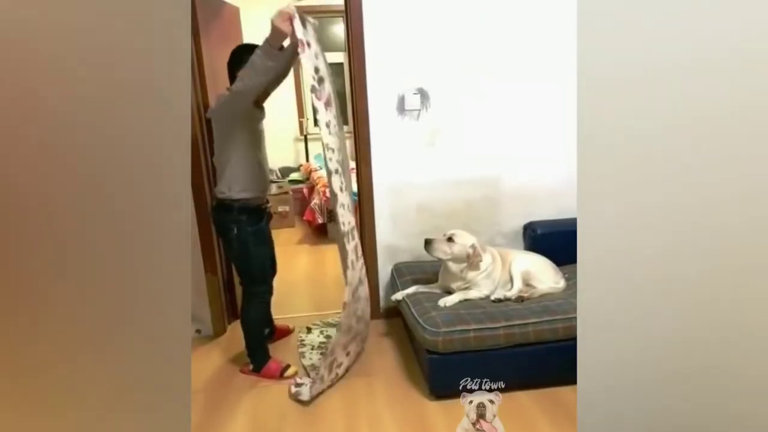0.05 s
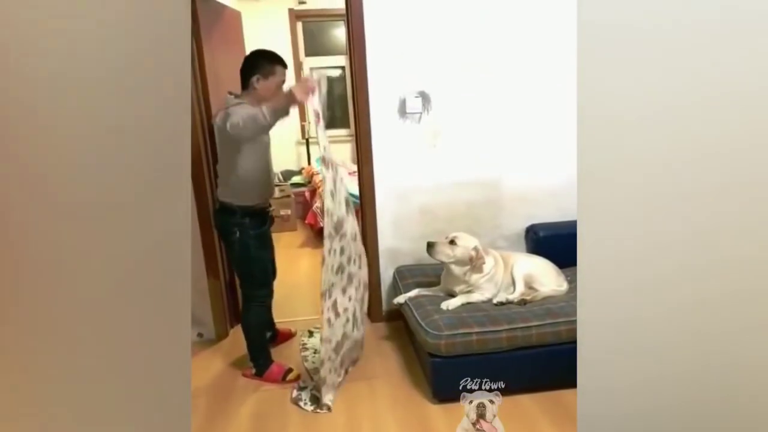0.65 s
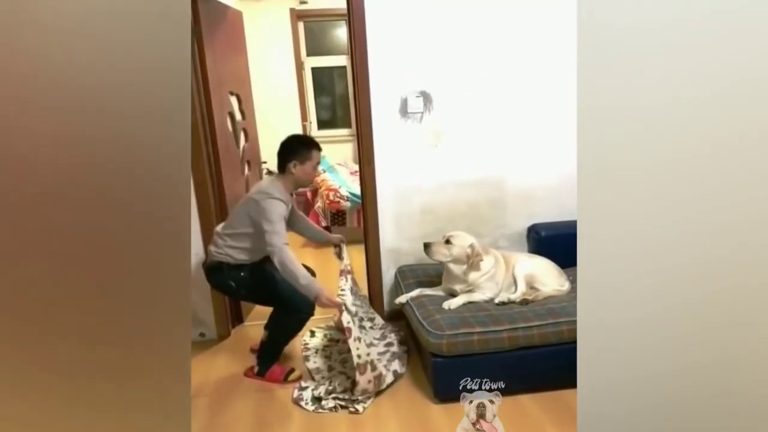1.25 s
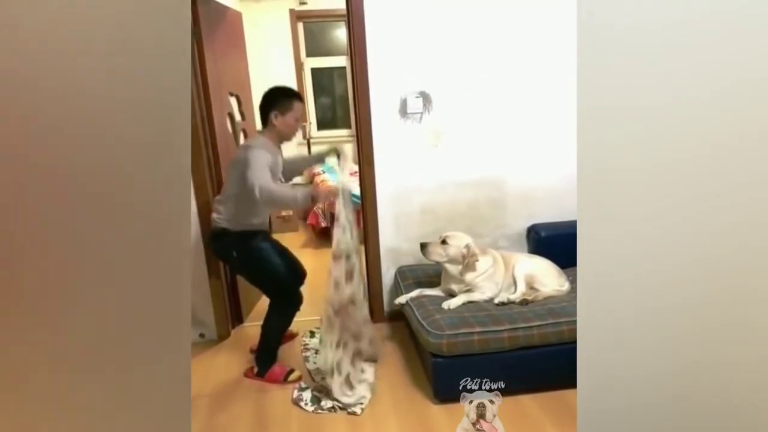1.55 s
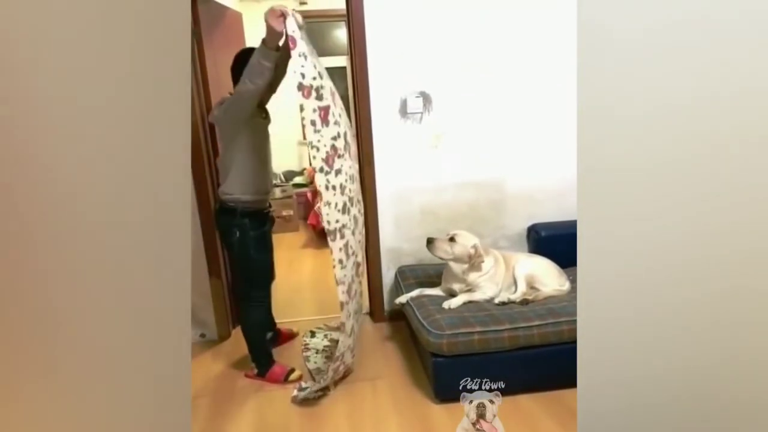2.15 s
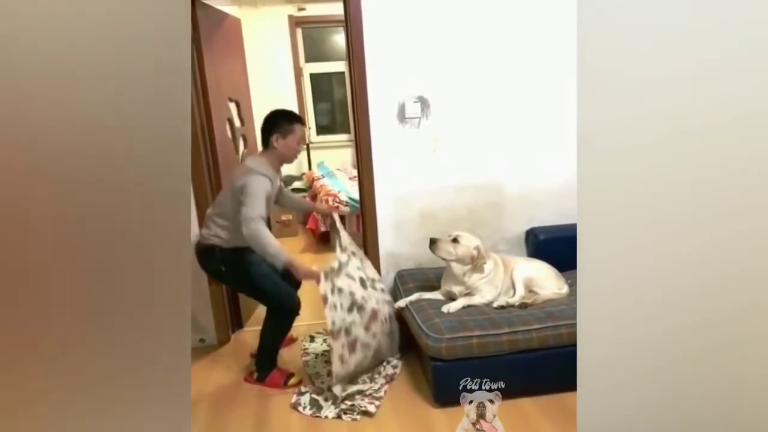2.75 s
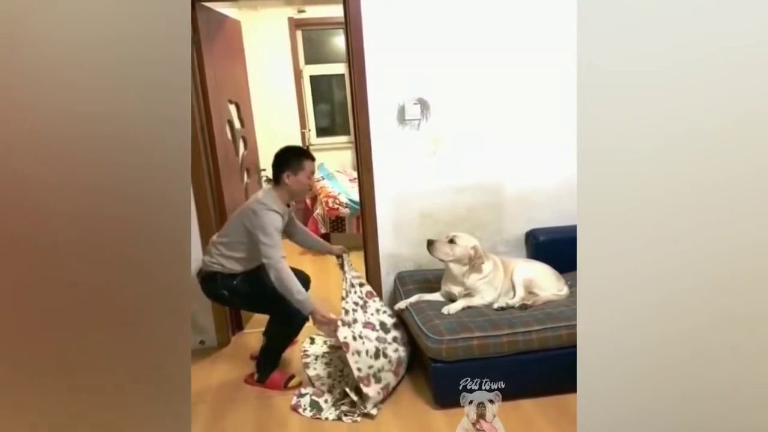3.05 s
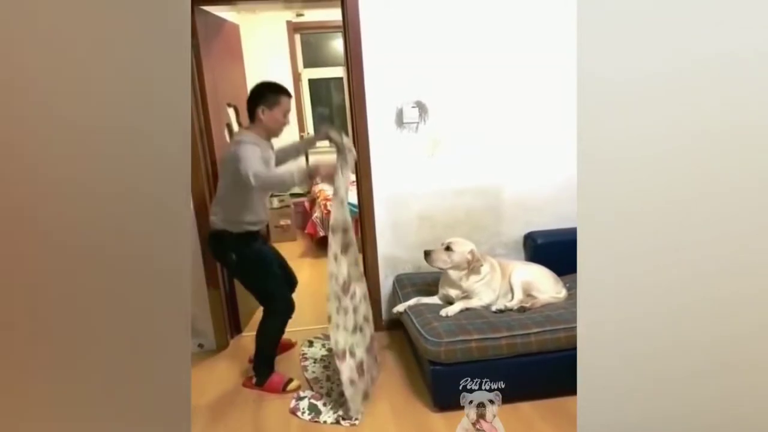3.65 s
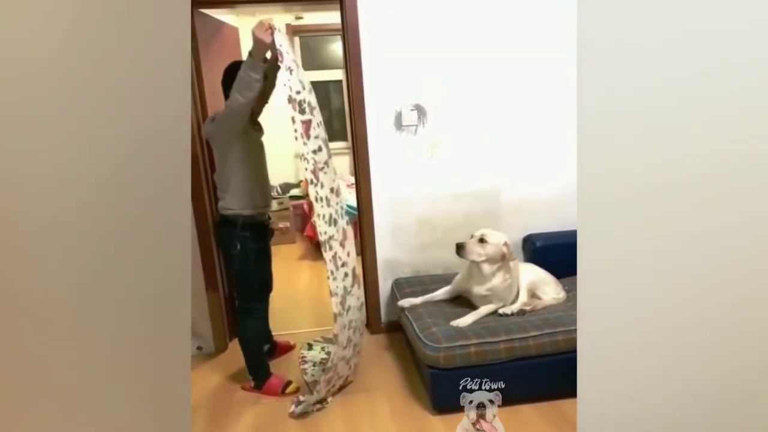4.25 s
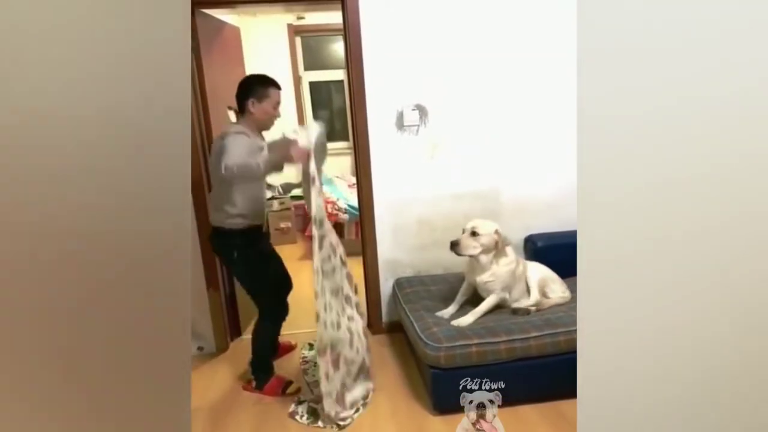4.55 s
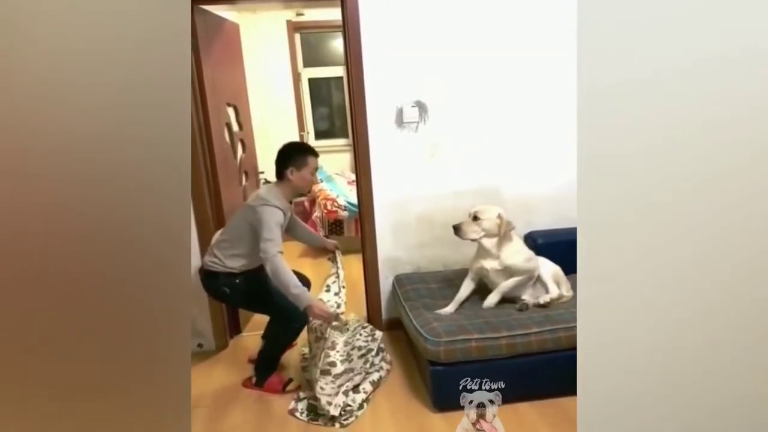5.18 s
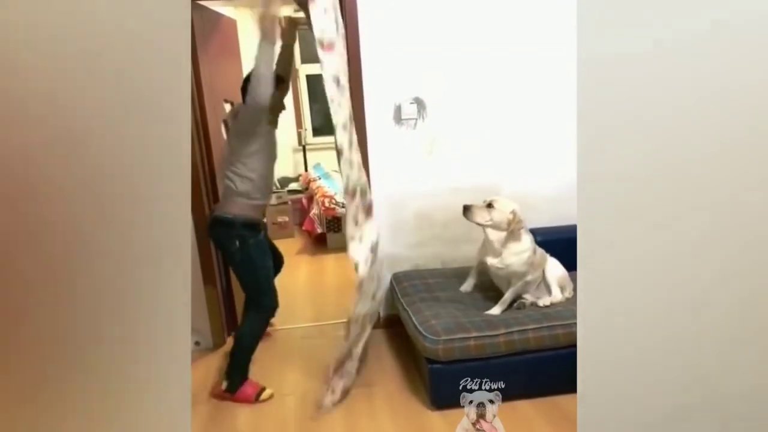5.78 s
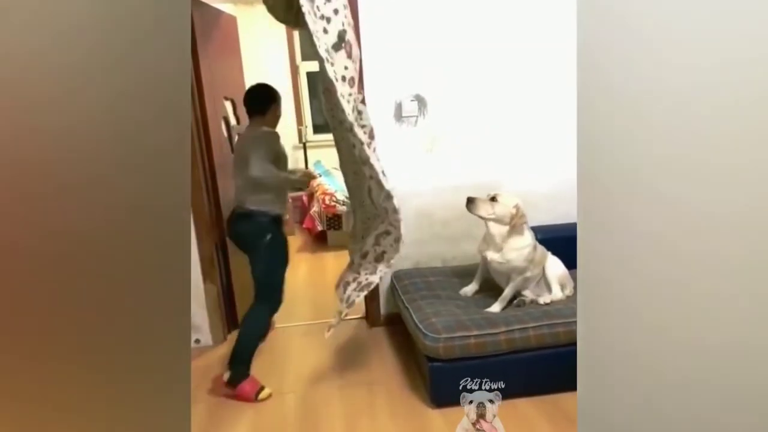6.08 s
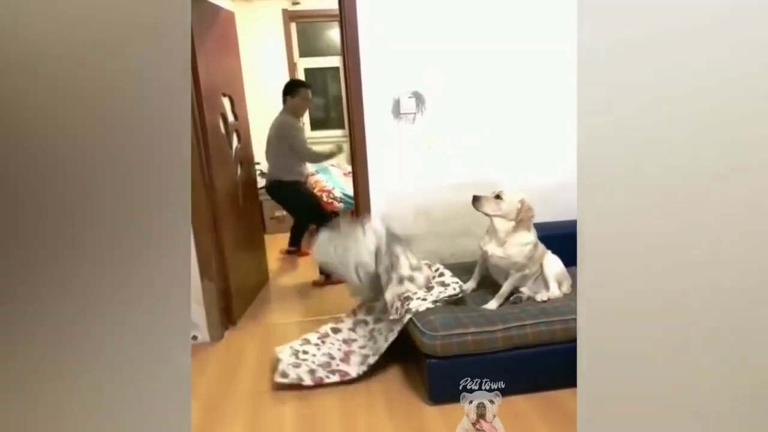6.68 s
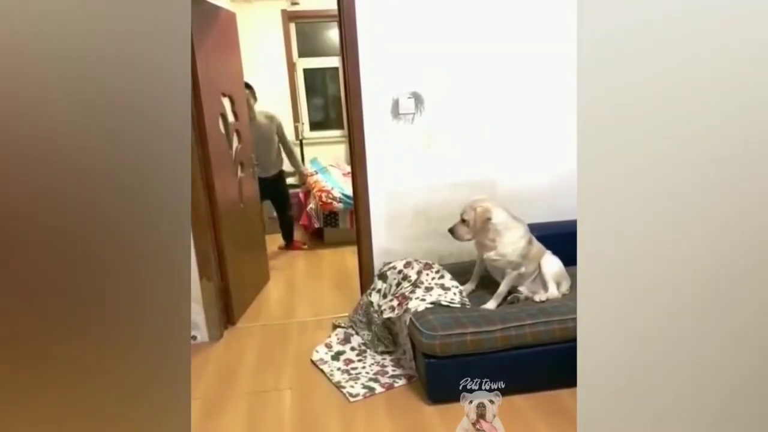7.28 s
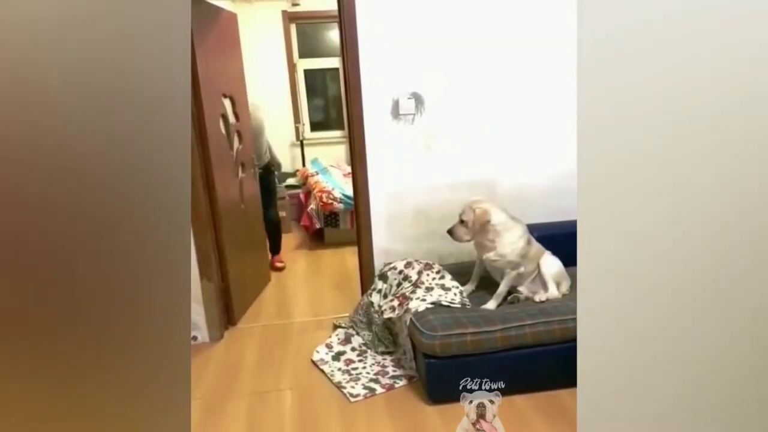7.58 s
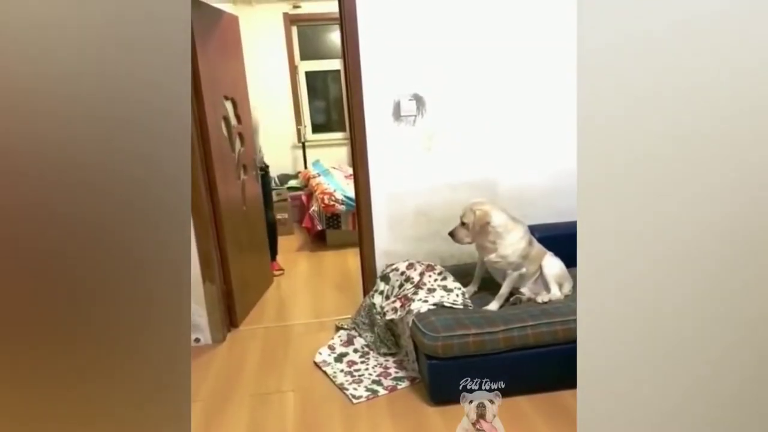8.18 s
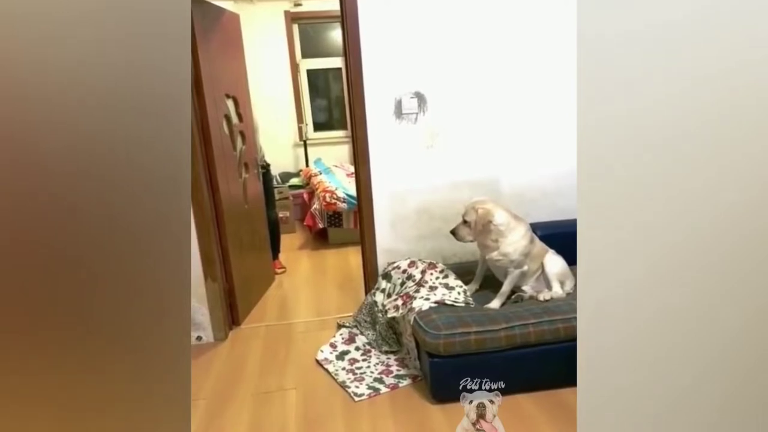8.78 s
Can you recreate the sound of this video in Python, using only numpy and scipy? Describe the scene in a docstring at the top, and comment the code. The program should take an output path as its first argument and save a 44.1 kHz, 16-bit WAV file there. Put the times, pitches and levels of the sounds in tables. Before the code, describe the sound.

A large quilt is flapped up and down indoors with soft whooshes and thuds, then slippers slap the floor and a door is bumped.

```python
"""A small hard-floored room, the microphone close to a large quilt, feet and door farther off.
A man lifts and drops the quilt three times: it billows, flutters and rubs, and its folds pull taut
with soft thuds. Near 4.6 s his slippers first slap the floor. At 6 s he tosses the quilt up and runs
while it collapses on a sofa. Last, he bumps a door, his clothes brushing along it as he hides behind."""
import sys
import numpy as np
from scipy import signal
from scipy.fft import rfft, irfft
from scipy.io import wavfile

SR = 44100
rng = np.random.default_rng(int(sys.argv[2]) if len(sys.argv) > 2 else 0)


def transcribe(signal):
    """Save signal, clipped to [-1, 1], as a 16-bit WAV file at the path in sys.argv[1]."""
    frames = np.atleast_2d(signal).T
    limited = np.clip(frames, -1, 1)
    pcm = np.round(limited * 32767).astype(np.int16)
    wavfile.write(sys.argv[1], SR, pcm)


N = 393656
CONTROL_TIME = np.arange(0, N, 32) / SR


def amp(db):
    """Decibels to gain."""
    return 10 ** (np.asarray(db) / 20)


def unit(x):
    """Scales to an rms of one."""
    return x / np.sqrt(np.mean(x ** 2) + 1e-20)


def read(points, hz):
    """Reads a table on a log-frequency axis."""
    f, value = np.transpose(points)
    return np.interp(np.log(hz + 1), np.log(f + 1), value)


def colour(x, spectrum, size=8192):
    """Causal filter of unit energy, shaped like the spectrum."""
    log_gain = np.log(amp(read(spectrum, abs(np.fft.fftfreq(size, 1 / SR)))))
    taps = np.fft.ifft(np.exp(np.conj(signal.hilbert(log_gain)))).real[:size // 2]
    return signal.oaconvolve(x, taps / np.linalg.norm(taps))[:len(x)]


def waver(hz):
    """Random wander of unit rms, up to about hz."""
    f = np.fft.rfftfreq(N, 1 / SR)
    band = (f > hz / 10) / (1 + (f / hz) ** 4)
    return unit(irfft(rfft(rng.standard_normal(N)) * band, N))


def grains(per_s, spread_db):
    """Tiny uneven impulses over an equal share of smooth noise."""
    sizes = amp(spread_db * np.minimum(rng.exponential(1, N), 4))
    clicks = sizes * rng.choice([-1, 1], N) * (rng.random(N) < per_s / SR)
    return unit(unit(clicks) + rng.standard_normal(N))


def burst(rise_s, fall_s, size=12000):
    """A contact: a quickly dying cluster of tiny impacts."""
    t = np.arange(size) / SR
    return rng.standard_normal(size) * (1 - np.exp(-t / rise_s)) * np.exp(-t / fall_s)


def swell(onset, attack_s, hold_s, release_s):
    """A movement's level, 30 dB per attack or release, and its time spent at full speed."""
    held_s = np.clip(CONTROL_TIME - onset, 0, hold_s)
    before = np.maximum(onset - CONTROL_TIME, 0) / attack_s
    after = np.maximum(CONTROL_TIME - onset - hold_s, 0) / release_s
    return -30 * (before + after), held_s


def power_to_gain(power):
    """Turns a slow power curve into a gain for every sample."""
    return np.interp(np.arange(N) / SR, CONTROL_TIME, np.sqrt(power))


# The quilt swung up, then let fall: (time at full speed [s], attack [s], hold [s], release [s],
# flutter [dB], air over flutter [dB], crispness over flutter [dB], rubbing [dB])
UPSWINGS = [(0.0, 0.22, .12, .26, -27, -2.5, -7, -51.5), (1.81, 0.31, 0.26, 0.21, -25, -9.5, -6, -48.5),
            (3.89, 0.24, 0.21, 0.34, -23.5, -9, -3, -50.5),
            (6.06, 0.16, 0.14, 0.18, -14, -5.5, -3.5, -41.5)]
DOWNSWINGS = [(0.95, 0.52, 0.32, 0.26, -32, -5.5, -3.5, -50), (2.81, .38, 0.26, 0.4, -29, -9, -4, -51),
              (4.95, 0.66, 0.21, 0.63, -31.5, -6.5, -3.5, -48.5),
              (6.31, 0.14, 0.072, 0.42, -26.5, -1.5, -1.5, -46.5), (6.8, 0.44, .8, .4, -37, -10, 0, -52),
              (6.97, 0.087, 0.11, .12, -29, 2.5, 1.5, -49),
              (7.13, 0.14, 0.21, 0.13, -21.5, -10.5, -2.5, -40.5)]
# Drift at full speed: (flutter sag [dB/s], air growth [dB/s], loss of crispness and rubbing [dB/s])
UNFURLING = (19, 28.5, 19)  # rising, the sheet catches the air
PILING_UP = (11.2, 2, 1.1)  # falling, it heaps on itself
def swings():
    """Each swing drives four gains: flutter, crisp edges, pushed air and rubbing."""
    rub_follow = 0.46  # dB of rubbing per dB of swell
    power = np.zeros((4, len(CONTROL_TIME)))
    for table, (sag, growth, dulling) in ((UPSWINGS, UNFURLING), (DOWNSWINGS, PILING_UP)):
        for *timing, db, air_db, crisp_db, rub_db in table:
            speed_db, held_s = swell(*timing)
            flutter_db = db + speed_db - sag * held_s
            power += amp([flutter_db,
                          flutter_db + crisp_db - dulling * held_s,
                          flutter_db + air_db + growth * held_s,
                          rub_db + rub_follow * speed_db - dulling * held_s]) ** 2
    return [power_to_gain(p) for p in power]


# Slack cloth, taut cloth and pushed air, heard close: (frequency [Hz], level [dB])
SOFT_SPECTRUM = [(60, -30), (105, -11), (135, -4), (165, -9.5), (215, -0.5), (390, -1.5), (480, -7),
                 (700, -19), (1200, -22), (3000, -54), (8000, -87.5)]
TAUT_SPECTRUM = [(250, -23), (470, -6), (680, 9), (1050, 3.5), (1850, 0.5), (2300, -11), (3200, -15),
                 (5000, -25.5), (9500, -62.5), (11500, -46)]
AIR_SPECTRUM = [(15, -37), (34, -8), (50, 4.5), (72, 1), (105, -9.5), (170, -26.5), (600, -100)]
def quilt(flutter, crisp, push):
    """Ripples cross the sheet as soft pops, while its whole face pushes air at the microphone."""
    ripples = grains(per_s=420, spread_db=0.5) * amp(0.91 * waver(hz=37.5))
    body = amp(-0.1) * colour(ripples * flutter, SOFT_SPECTRUM)
    edges = amp(-3) * colour(ripples * crisp, TAUT_SPECTRUM)
    air = amp(3) * unit(colour(rng.standard_normal(N), AIR_SPECTRUM)) * push
    return body + edges, air


# Rubbing threads, heard close: (frequency [Hz], level [dB])
WEAVE_SPECTRUM = [(600, -9.5), (1600, 1), (2400, -3.5), (3100, 2), (4000, -2.5), (5000, -8), (7000, -12),
                  (9200, -13), (11000, -34.5)]
def rustle(sliding):
    """Threads catch and slip in clumps as the layers slide."""
    slips = grains(per_s=1800, spread_db=1) * sliding * amp(waver(hz=32))
    return amp(1.5) * colour(slips, WEAVE_SPECTRUM)


# Cloth dragged over cloth or along the door:
# (time at full speed [s], attack [s], hold [s], release [s], level [dB])
CLOTH_DRAGS = [(0.2, .5, .02, 0.49, -55), (1.026, 0.1, 0.03, 0.28, -43.5), (1.67, 0.42, 0.018, .3, -48.5),
               (2.984, 0.41, .02, 0.84, -45.5), (3.68, 0.17, .02, 0.33, -52),
               (4.08, 0.091, 0.018, 0.43, -47.5), (4.739, 0.046, 0.017, 0.17, -43),
               (6.166, 0.15, .02, 0.34, -39.5), (6.472, 0.25, 0.036, 0.38, -35),
               (6.854, 0.41, 0.022, .3, -38), (7.24, 0.47, .31, 0.27, -36),
               (7.685, 0.13, 0.019, 0.22, -37.5), (8.165, 0.13, .02, 0.13, -47),
               (8.31, .3, 0.03, 0.34, -52.5)]
def drags():
    """Each drag swells and fades; together they give a gain for the rustle."""
    power = sum(amp(db + swell(*timing)[0]) ** 2 for *timing, db in CLOTH_DRAGS)
    return power_to_gain(power)


# Folds pulling taut near the microphone: (time [s], level [dB], crispness [dB])
FOLD_THUDS = [(0.921, -16.5, -6), (1.051, -12, -5), (1.215, -22, -10), (1.749, -15.5, -12),
              (1.802, -21.5, -1), (1.994, -22.5, -23), (2.82, -14.5, -5), (2.985, -17.5, -3.5),
              (3.875, -24.5, 3), (4.015, -9, -11.5), (4.742, -24, -0.5), (4.865, -18.5, -7.5),
              (5.015, -16.5, -9.5), (5.937, -14.5, -11), (5.975, -14, -12), (6.022, -10, -17),
              (6.189, -6.5, -6), (7.102, -9.5, -12), (7.204, -11, -3)]
def folds():
    """A fold stops short with a puff: slack cloth shoves more air, taut cloth snaps in its weave."""
    out = np.zeros(N)
    for onset, db, crisp_db in FOLD_THUDS:
        puff = burst(rise_s=0.0048, fall_s=0.018)
        thud = colour(puff, SOFT_SPECTRUM)
        edge = amp(crisp_db) * colour(puff, TAUT_SPECTRUM)
        snap = amp(2 * crisp_db - 8.5) * colour(puff, WEAVE_SPECTRUM)
        shove = amp(-crisp_db - 15) * colour(puff, AIR_SPECTRUM)
        add(out, onset, amp(db - 2.5) * (thud + edge + snap + shove))
    return out


# Steps, farther off: (time [s], level [dB], heel over sole [dB], contact decay [s])
SLAPS = [(4.5937, -17.5, -11.5, 0.012), (4.887, -28.5, -9, 0.0086), (4.918, -25.5, -12, 0.005),
         (5.862, -27.5, -18, 0.01), (6.311, -23.5, -6, .006), (6.3781, -10, 3.5, 0.009),
         (6.412, -18, -13, 0.0092), (6.626, -21.5, -5, 0.0084), (6.9001, 0, -8, 0.0071),
         (7.798, -26.5, -6, 0.0093)]
# A sole on the hard floor: (frequency [Hz], level [dB])
SOLE_SPECTRUM = [(200, 1), (900, -8), (1400, 0.5), (2700, -2.5), (4100, -1.5), (4900, -15), (7200, -17),
                 (9500, -25.5), (11000, -41)]
# Short scrapes, of a sole on the floor or of clothes along the door: (middle time [s], level [dB], length [s],
# band centre [Hz])
SCRAPES = [(6.692, -39, 0.13, 450), (7.379, -33.5, 0.059, 2620), (7.43, -36.5, 0.066, 2080),
           (7.544, -35, 0.061, 3500), (7.812, -42.5, 0.065, 1700), (7.869, -41, .08, 1090),
           (8.362, -42.5, 0.079, 1310), (8.486, -48, 0.17, 1440)]
def slippers():
    """Flat soles crack against the floor over the thump of the heel, and short scrapes rasp in narrow bands."""
    out = np.zeros(N)
    for onset, db, heel_db, contact_s in SLAPS:
        contact = burst(rise_s=0.001, fall_s=contact_s)
        contact[0] += 0.04 / contact_s  # a flatter landing cracks more sharply
        heel = colour(burst(rise_s=0.0064, fall_s=0.024), SOFT_SPECTRUM)
        add(out, onset, amp(db - 5.5) * (colour(contact, SOLE_SPECTRUM) + amp(heel_db) * heel))
    for middle, db, length_s, hz in SCRAPES:
        stroke = np.hanning(int(length_s * SR))
        scuff = signal.lfilter(*signal.iirpeak(hz, Q=3, fs=SR), rng.standard_normal(len(stroke)))
        add(out, middle - length_s / 2, amp(db) * unit(scuff) * stroke)
    return out


# Bumps on the door, away from the microphone: (time [s], level [dB], relative handle level [dB])
DOOR_BUMPS = [(6.388, -25.5, 10), (7.467, -23.5, -41), (7.582, -26.5, -18), (8.101, -33.5, -23),
              (8.141, -30, -7), (8.172, -21.5, -11.5)]
# Its wooden panel: (frequency [Hz], level [dB])
PANEL_SPECTRUM = [(60, -3), (140, 2), (400, -4.5), (560, 3), (720, -3), (880, -19), (1500, -16),
                  (1850, -18), (2200, -16), (3300, -19), (9000, -37)]
# Its metal handle: (frequency [Hz], level [dB], 60 dB decay [s])
HANDLE_MODES = [(1600, -4.5, 0.19), (1776, 0, 0.14), (1833, 3.5, 0.42), (3160, -9, .37)]
def door():
    """Each bump knocks dully on the panel and shakes the handle into ringing."""
    t = np.arange(SR // 2) / SR
    ring = sum(amp(db - 60 * t / t60) * np.sin(2 * np.pi * hz * t) for hz, db, t60 in HANDLE_MODES)
    out = np.zeros(N)
    for onset, db, handle_db in DOOR_BUMPS:
        blow = burst(rise_s=0.00024, fall_s=0.014)
        rattle = 0.5 * signal.fftconvolve(blow / np.linalg.norm(blow), ring)[:len(blow)]
        add(out, onset, amp(db - 3) * (colour(blow, PANEL_SPECTRUM) + amp(handle_db) * rattle))
    return out


# The small room's reverberation: (frequency [Hz], 60 dB decay [s])
ROOM_DECAY = [(100, 0.39), (1500, 0.51), (4000, 0.31), (10000, 0.38)]
def room(x, wet_db, size=256):
    """Diffuse reverberation: each band stores the energy it receives and lets it die away."""
    hz, t, bands = signal.stft(x, SR, nperseg=size)
    keep = amp(-120 * t[1] / read(ROOM_DECAY, hz))  # share of energy left after one frame
    stored = np.array([signal.lfilter([0, 1 - k], [1, -k], abs(b) ** 2) for k, b in zip(keep, bands)])
    scatter = signal.stft(rng.standard_normal(N), SR, nperseg=size)[2]
    tail = signal.istft(scatter / np.std(scatter) * np.sqrt(stored), SR, nperseg=size)[1][:N]
    doorway = signal.butter(2, 130, "high", fs=SR, output="sos")  # the open doorway lets the bass out
    return x + amp(wet_db) * signal.sosfilt(doorway, tail)


# Standing waves at the microphone's spot: (frequency [Hz], width [Hz], boost or cut [dB])
ROOM_MODES = [(135, 6.9, 4), (225.5, 5.3, 0), (260.7, 4.9, -4), (328, 2.5, 0), (397, 6.8, -3)]
def walls(x, count=14):
    """Close walls send back single echoes; standing waves between them boom or cancel."""
    echoes = np.zeros(SR // 10)
    delay_s = rng.uniform(0.003, 0.06, count)
    strengths = amp(-14.5) * np.exp(-delay_s / 0.03)
    echoes[(delay_s * SR).astype(int)] = strengths * rng.choice([-1, 1], count)
    echoes[0] = 1  # the direct path
    x = signal.oaconvolve(x, echoes / np.linalg.norm(echoes))[:N]
    return x + sum((amp(db) - 1) * signal.lfilter(*signal.iirpeak(hz, hz / width, SR), x)
                   for hz, width, db in ROOM_MODES)


# Room tone: (frequency [Hz], level [dB])
HUSH_SPECTRUM = [(20, -31), (36, -15.5), (52, 7), (100, -2), (170, -8), (260, -9), (400, -12), (1000, -17),
                 (1800, -17.5), (2400, -22.5), (3500, -24), (5000, -27.5), (9500, -38), (11500, -47.5)]
def room_tone():
    """A steady low hush lies under everything."""
    return amp(-47) * unit(colour(rng.standard_normal(N), HUSH_SPECTRUM))


def add(mix, onset, sound):
    """Mixes a sound in at its onset, in seconds."""
    part = mix[max(round(onset * SR), 0):][:len(sound)]
    part += sound[:len(part)]


def scene():
    """From the microphone: near cloth, farther feet and door; only the finest rustle has width."""
    flutter, crisp, push, rub = swings()
    sliding = np.hypot(rub, drags())
    sheet, air = quilt(flutter, crisp, push)
    near = room(sheet + rustle(sliding), wet_db=-7) + room(folds(), wet_db=-3)
    far = room(slippers() + door(), wet_db=0.5)
    hush = room_tone()
    treble = signal.butter(12, 4800, "high", fs=SR, output="sos")
    side = amp(-11) * signal.sosfilt(treble, rustle(sliding))
    return walls(near + far) + air + hush + np.outer([1, -1], side)


def record(dry):
    """The loudest peaks are rounded off; then the recorder's band limit."""
    ceiling, edge_hz = 0.88, 11200
    rounded = dry / (1 + (dry / ceiling) ** 6) ** (1 / 6)
    lowpass = signal.firwin(127, edge_hz, window=("kaiser", 9), fs=SR)
    return signal.oaconvolve(rounded, lowpass[None], "same")


dry = scene()
out = record(dry)
transcribe(out)
```